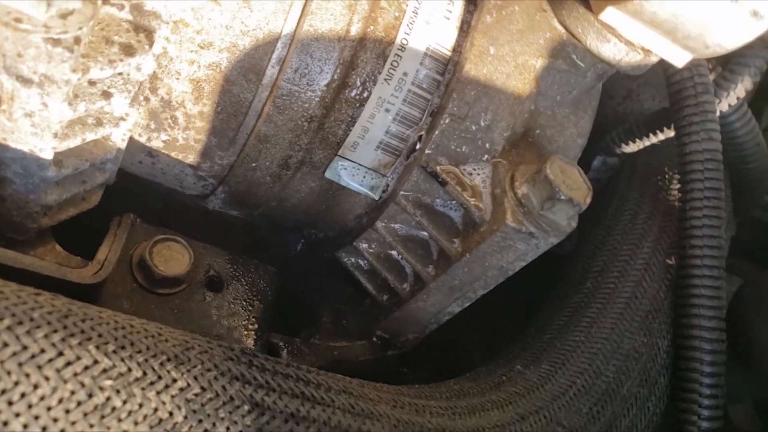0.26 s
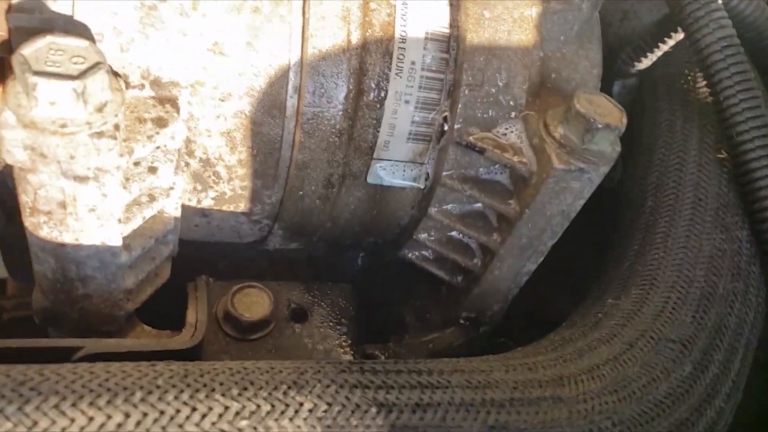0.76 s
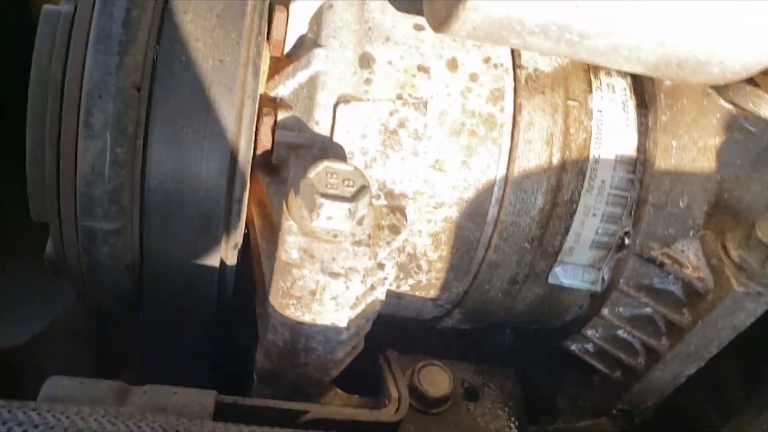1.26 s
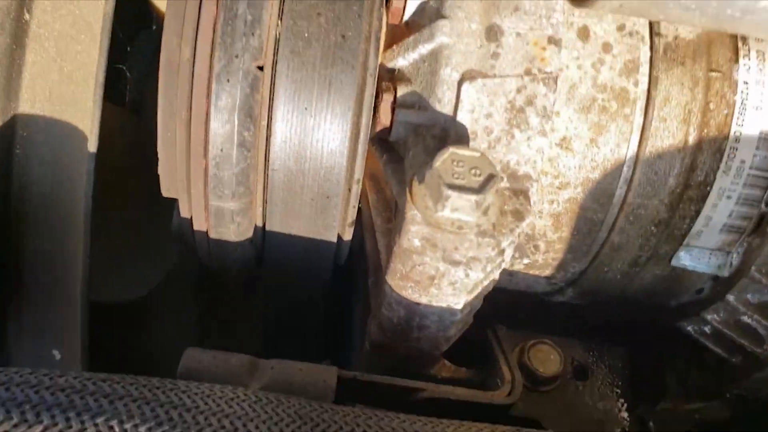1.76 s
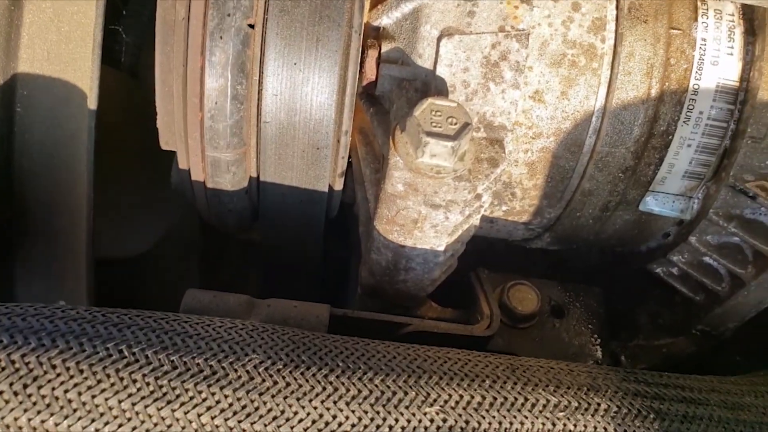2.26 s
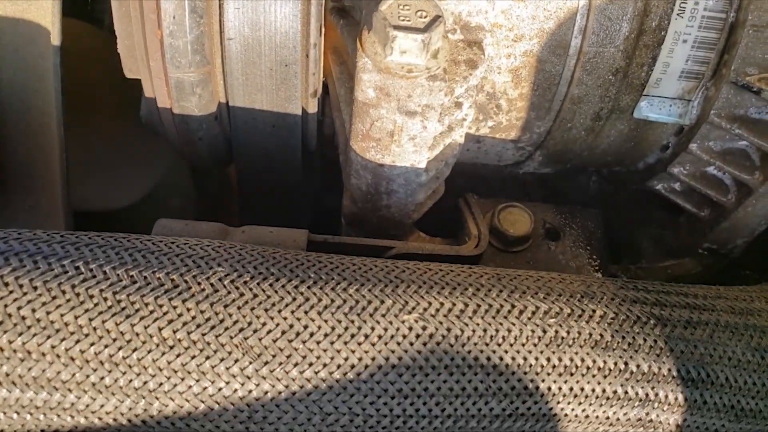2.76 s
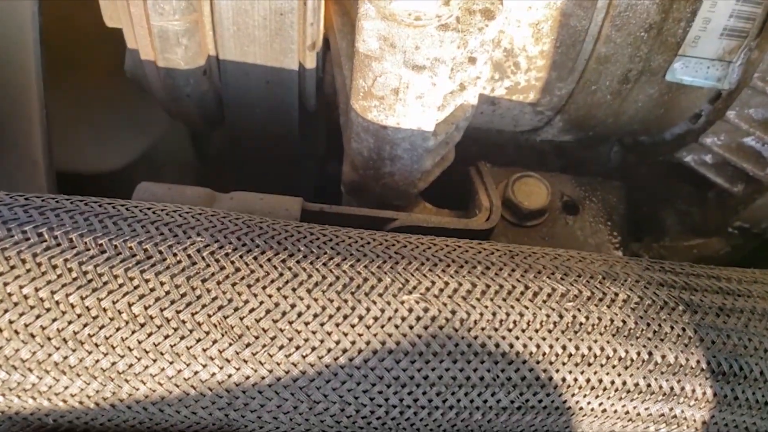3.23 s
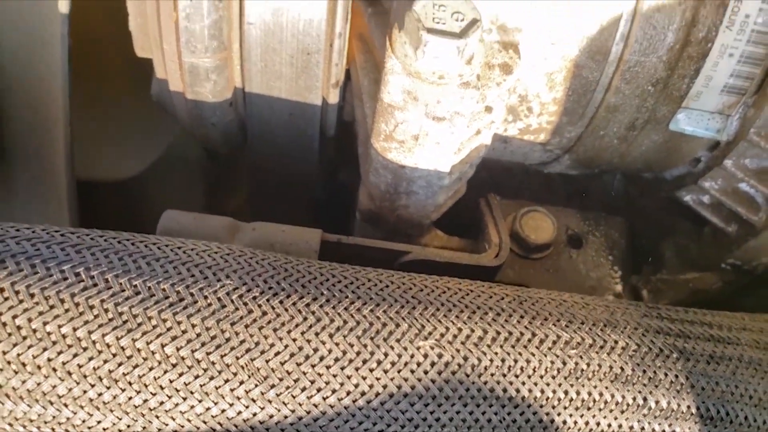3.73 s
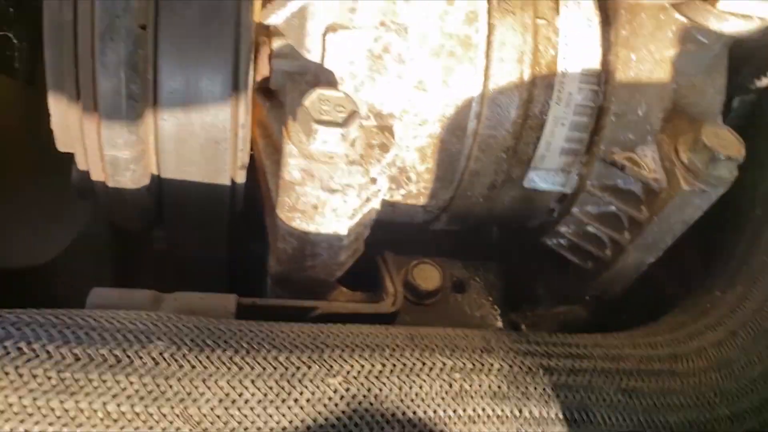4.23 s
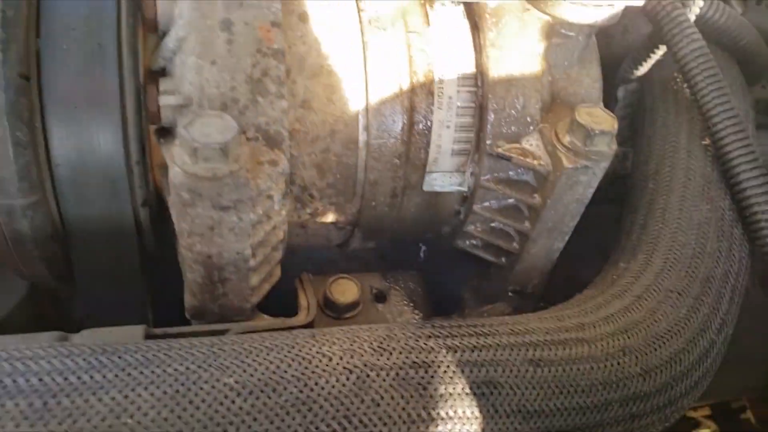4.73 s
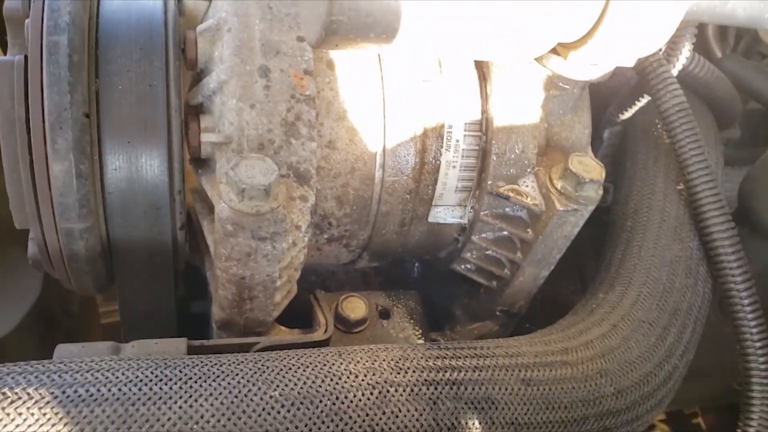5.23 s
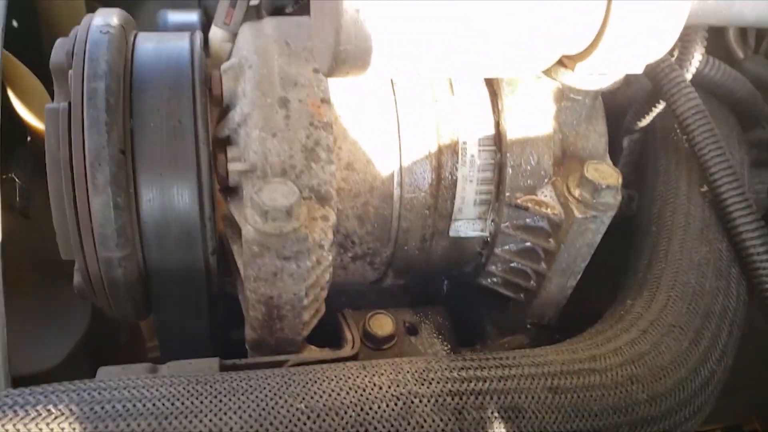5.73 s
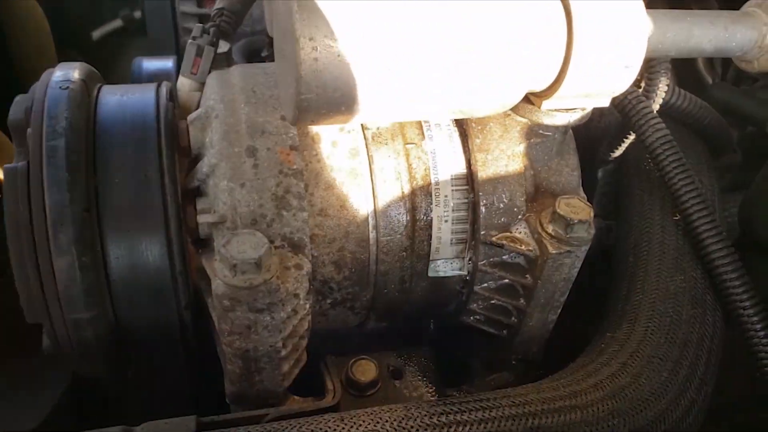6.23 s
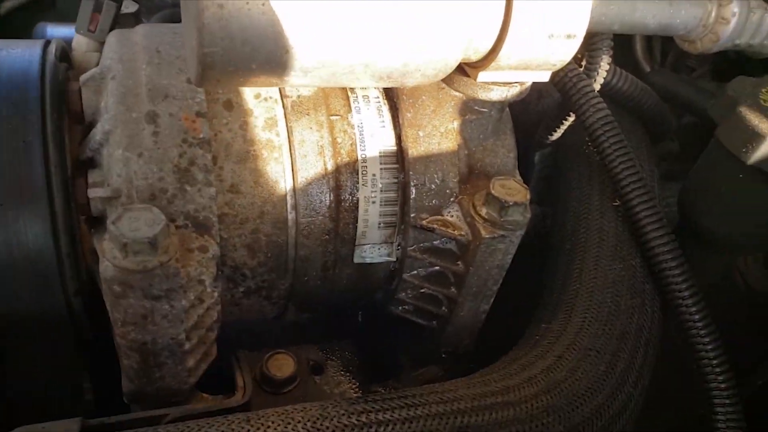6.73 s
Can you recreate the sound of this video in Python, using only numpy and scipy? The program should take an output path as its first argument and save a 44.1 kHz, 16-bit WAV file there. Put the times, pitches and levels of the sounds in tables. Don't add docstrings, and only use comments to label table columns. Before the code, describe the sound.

Outdoors, a steady low idle and far traffic rumble; two sharp hollow metal knocks mid-way, faint insect chirps, then close clicks from handling.

```python
import sys
import numpy as np
from scipy import signal
from scipy.fft import rfft, irfft, next_fast_len
from scipy.io import wavfile
from scipy.ndimage import uniform_filter1d

SR = 44100
rng = np.random.default_rng(int(sys.argv[2]) if len(sys.argv) > 2 else 0)


def volts(x):
    e = np.asarray(x, float) / 20
    return 10 ** e


def digitize_waveform(pressure):
    field = np.atleast_2d(pressure).T
    bounded = np.clip(field, -1, 1)
    quanta = np.round(bounded * 32767).astype(np.int16)
    wavfile.write(sys.argv[1], SR, quanta)


N = 308170
TIME = np.arange(N) / SR

# pitch_hz, t60_s (time to fade 60 dB), first_swing (sign and relative size),
# level_db when struck at spot 0, level_db when struck at spot 1
BODY_MODES = [(83.8, 0.19, 0.45, -14.5, -15), (98.8, 0.33, 0.38, -20, -22.5),
              (134.2, 0.25, -0.57, -27, -15), (205.4, 0.13, -0.37, -15, -13.5), (156, 0.12, 0.98, -21, -20),
              (255, 0.082, -1.1, -15.5, -28), (275, 0.11, -0.87, -18, -15), (357, 0.17, -1.7, -31, -33),
              (440, 0.3, 0.39, -31, -25), (508, 0.26, -0.29, -34, -28), (603, 0.067, -0.33, -18, -15.5),
              (688, 0.061, 0.63, -64, -29), (746, 0.079, -1.02, -20.5, -27.5),
              (786, 0.038, -0.54, -36, -28), (816, 0.09, -0.36, -37.5, -43), (985, 0.08, 0.084, -21, -12),
              (904, 0.11, -0.62, -27, -34), (1100, 0.084, 0.27, -41, -27), (1377, 0.11, -0.58, -38, -21.5),
              (1520, 0.046, 0.63, -27.5, -23), (1655, 0.01, -0.81, -17, -41), (2250, 0.026, 0.88, -27, -37),
              (2690, 0.015, -0.95, -21.5, -30), (4240, 0.014, 0.41, -25, -19),
              (5980, 0.007, -0.84, -26, -26), (6780, 0.014, 0.9, -32, -23.5)]
# start_s, spot (0 or 1), strength_db, contact_brightness_hz, rattle_db
BLOWS = [(2.7898, 0, 0.5, 9000, -22), (2.7984, 0, -4.5, 1100, -62), (2.811, 0, -17, 2500, -45),
         (2.8194, 0, -16, 900, -35.5), (2.858, 0, -28, 700, -38), (3.183, 1, -18.5, 476, -59),
         (3.4778, 1, -14, 1500, -39), (3.5095, 1, -0.5, 8900, -23), (3.5197, 1, -1, 700, -41),
         (3.535, 1, -10.5, 1200, -48), (3.551, 1, -23, 800, -67), (3.576, 1, -16, 400, -56),
         (1.194, 0, -27.5, 1200, -52), (1.268, 0, -30.5, 1470, -60)]
# pitch_hz, level_db (per Hz)
RATTLE_COLOUR = [(150, 3.5), (300, -1), (500, -7.5), (800, -13), (1400, -19), (2500, -26), (6000, -26),
                 (16000, -66)]
# pitch_hz, t60_s
RATTLE_FADE = [(80, 0.3), (400, 0.22), (1500, 0.14), (6000, 0.026), (16000, 0.071)]
# pitch_hz, left_minus_right_db
KNOCK_LEAN = [(60, 4), (125, -1), (250, -1.5), (500, -2), (1000, -1), (2000, -7), (5000, -9.5)]
KNOCK_PAN_DB, KNOCK_LAG_S, PORT_SPREAD_DB = -2.5, 0.00034, 1.5

# start_s, peak_db, ring_hz, left_minus_right_db, ring_share (0-1)
CRACKS = [
    (2.7895, -26, 2900, -8, 0),
    (3.5093, -20.5, 2870, -7, 0.05),
]
# start_s, peak_db, ring_hz, left_minus_right_db, ring_share (0-1)
TICKS = [(0.258, -45, 12900, 0.0, 0.46), (0.6517, -45.5, 6750, -4, 0.76), (1.324, -40, 9920, 10, 0.44),
         (4.909, -41, 7570, 9, 0.08), (5.184, -36, 12700, 3.5, 0), (5.736, -37.5, 7600, -12, 0.28),
         (5.745, -31, 7500, -8, 0.13), (5.804, -33, 6860, -9, 0.08), (6.072, -24.5, 6530, 7, 0.17),
         (6.405, -31.5, 7400, 2, 0.14), (6.7004, -34, 11800, 0, 0)]
# start_s, peak_db, ring_hz, left_minus_right_db, ring_share (0-1)
TAPS = [
    (0.015, -43, 3300, -19, 0.27),
    (0.0554, -42.5, 3660, -24, 0.5),
    (0.064, -26.5, 3600, -29, 0.24),
    (0.939, -40, 3700, -6, 0.86),
    (5.4829, -25, 2600, 2, 0.07),
    (5.4977, -38, 2920, -23, 0.04),
    (5.746, -55, 2620, -19, 0.9),
    (5.5259, -38, 2480, -22, 0.28),
]
# start_s, peak_db, ring_hz, left_minus_right_db, ring_share (0-1)
THUDS = [(.034, -54, 3260, -18, 0.5), (.931, -54, 2260, -11, 0.05), (1.029, -56, 1240, -12, 0.15),
         (1.177, -50, 1220, -7, 0.47), (1.194, -48, 980, 9, 0.67), (1.196, -51, 1380, -8, 0.8),
         (1.198, -50.5, 2370, -6, 0.56), (1.268, -54.5, 980, -4, 0.8), (1.298, -58, 1100, 2, 0.36),
         (1.309, -57, 1290, -1, 0.44), (1.268, -60, 1800, -2, 0.4), (1.181, -54, 2270, -6, 0.5),
         (3.019, -63, 1030, -21, 0.3), (3.2159, -43, 2890, -13.5, 0), (5.483, -51, 650, -29, 0.1),
         (5.526, -51.5, 610, -18, 0.19), (6.132, -58, 860, -16, 0)]
# t60_s, lowest_share (lowest frequency as a share of the ring)
CONTACTS = [
    (0.0058, 0.79),
    (0.0039, 0.6),
    (0.034, 0.08),
    (0.015, 0.92),
]

# start_s, length_s, level_db, pitch_hz, width_hz, left_minus_right_db
SQUEAKS = [
    (1.09, 0.097, -65.5, 2730, 150, -5),
    (1.146, .02, -65, 1150, 252, -2),
    (0.065, 0.069, -70, 4840, 250, -8),
    (0.069, 0.026, -61, 3250, 400, -13),
    (2.843, .035, -53.5, 2880, 500, -6),
    (5.528, .05, -66, 2300, 900, -11),
]
# start_s, length_s, level_db, left_minus_right_db, lowest_hz
RUBS = [(.02, 0.087, -63, -14, 10000), (.19, .08, -69, -8, 10100), (.35, 0.15, -59, -3, 8000),
        (0.9, 0.28, -61, -1, 1180), (1.125, 0.08, -55.5, 2, 4040), (1.96, 0.26, -65, -1, 1450),
        (2.547, 0.22, -64.5, -3, 840), (2.793, 0.028, -56, -10, 1505), (2.825, 0.065, -47.5, -2.5, 1520),
        (2.983, 0.049, -55, -2, 3540), (3.196, 0.19, -65, -5, 1490), (3.478, .012, -56, -2, 5000),
        (3.51, 0.056, -49.5, -1, 1510), (4.646, 0.015, -61.5, 16, 4000), (4.709, 0.034, -58.5, 9, 3940),
        (4.908, 0.029, -57, 13, 4000), (4.946, 0.045, -55, 14, 3700), (5.13, 0.038, -61.5, 13, 4440),
        (5.183, 0.047, -58, 8, 10500), (5.408, 0.041, -57, 12, 10500), (5.274, 0.08, -55.5, 17, 3720),
        (5.536, 0.026, -53.5, -10, 6000), (5.777, 0.15, -56, -1, 8200), (6.496, 0.25, -60.5, 4, 9900),
        (6.035, 0.39, -59, -2, 1510)]
# start_s, length_s, level_db, left_minus_right_db, highest_hz
MUFFLED_RUBS = [
    (0.013, 0.085, -55, -12, 7450),
    (1.088, 0.12, -56, -1, 3000),
    (1.13, 0.077, -59, -2, 2700),
    (1.272, 0.042, -54, -1, 1500),
    (5.423, 0.086, -62, -15, 2520),
    (6.048, 0.39, -63.5, -7.5, 1240),
]
MUFFLED_SPAN = 3.24
# pitch_hz, level_db
PORT_COLOUR = [(800, 12), (2500, 6), (3400, 3), (4300, 3.5), (7200, 7), (9000, -8), (11000, 2), (13500, 4),
               (15500, 4.5), (17000, -22)]

# start_s, length_s, level_db, pitch_hz, left_minus_right_db
PUFFS = [
    (.42, .07, -41, 60, 1.5),
    (1.12, .09, -45, 70, 1.5),
    (1.855, .07, -47, 88, 14),
    (1.97, .1, -42, 72, 16),
    (2.1, .15, -48, 65, 10),
    (2.295, .08, -45, 65, 14),
    (4.93, .12, -45, 65, 12),
    (5.12, .1, -47, 65, 10),
    (6.35, .1, -46, 60, 3),
    (6.75, .24, -45, 65, 0.5),
]

# start_s, gap_s, chirp_count, level_db
PHRASES = [
    (1.331, .092, 7, -73),
    (1.933, .078, 3, -71),
    (2.174, .0885, 5, -71.5),
    (2.627, .0945, 6, -70.5),
    (3.166, .0755, 5, -71),
    (3.535, .069, 6, -72),
    (3.942, .064, 6, -75),
    (5.749, .08, 1, -73),
    (6.105, .086, 5, -76),
    (6.542, .094, 5, -76),
]
# multiple, level_db
CHIRP_PARTIALS = [(2, -6), (3, 2), (4, 6), (5, 7)]
CHIRP_TOP_HZ, CHIRP_MID_HZ, CHIRP_END_HZ = 4150, 3500, 2760
CHIRP_WAVER_HZ = 60
STROKE_SHARE = .38

# multiple, level_db (rms)
IDLE_ORDERS = [(2, -51), (3, -57), (4.33, -57), (5, -62), (6, -59), (7, -63)]
IDLE_HZ, IDLE_WAVER_HZ, IDLE_FLUTTER_DB = 27.85, .06, 1.4

# pitch_hz, level_db (per Hz)
RUMBLE = [(32, -39), (40, -4.5), (50, -4), (65, -3), (90, -2), (125, -8.5), (170, -13.5), (250, -21)]
# pitch_hz, level_db (per Hz)
ROAR = [(200, -11), (250, 3.5), (290, 0), (350, -6.5), (420, -13), (520, -24.5), (700, -21.5)]
# pitch_hz, level_db (per Hz)
STREET = [(260, -19), (450, -1), (720, -19), (918, -8), (1320, -11), (1890, -4), (2500, -10.5),
          (3110, -15.5), (3600, -10.5), (4680, -26), (7920, -120)]
# pitch_hz, level_db (per Hz)
AIR = [(2600, 21), (3400, -27.5), (4200, 5), (5500, 5.5), (7300, 7.5), (8200, 5), (9300, -30),
       (10800, -11.5), (12000, 10.5), (15500, 5.5), (17000, 4.5)]
# pitch_hz, likeness (-1 to 1)
LIKENESS = [(60, 0.98), (180, 0.94), (550, 0.55), (1650, -0.28), (4970, 0.029), (15000, -0.1)]
# pitch_hz, left_minus_right_db
BACKGROUND_LEAN = [(60, -0.5), (180, -1), (550, -0.5), (1650, -8), (4970, 1.0), (15000, 5)]
# start_s, swell_db
TRAFFIC = [(0.0, -3.5), (0.9, -4), (1.2, -3.5), (1.75, -3), (2.05, 6), (2.4, 3), (2.75, 2), (3.0, 6.5),
           (3.3, 3.5), (3.62, 1), (4.3, -4), (4.75, -7), (5.14, 0.5), (5.4, 3.5), (5.72, -6.5), (6.23, 3),
           (6.62, -1.5), (6.99, 3)]
# start_s, stir_db
STIR = [(0.0, 2.5), (0.25, 0.5), (0.9, 0), (1.17, 7.5), (1.4, 3), (2.37, 1.5), (2.65, 5.5), (3.0, -0.5),
        (3.62, -1), (3.97, -4), (5.14, -0.5), (5.42, 4.5), (6.03, -1), (6.25, -2), (6.99, -0.5)]
RUMBLE_DB, ROAR_DB, STREET_DB, AIR_DB = -48.5, -60.5, -66, -63
RUMBLE_FOLLOWS, AIR_FOLLOWS = 0.2, 0.17

CUTOFF_HZ, LIMIT = 16050, .66


def rms_one(x):
    return x / np.sqrt(np.mean(x ** 2) + 1e-20)


def at_hz(points, hz):
    table_hz, values = np.transpose(points)
    return np.interp(np.log(hz), np.log(table_hz), values)


def pan(db):
    return volts(np.array([[db / 2], [-db / 2]]))


def add(out, s, sound):
    i = max(round(s * SR), 0)
    out[:, i:i + sound.shape[1]] += sound[:, :N - i]


def band_pass(low_hz, high_hz, x):
    return signal.sosfilt(signal.butter(2, [low_hz, high_hz], "band", fs=SR, output="sos"), x)


def low_pass(order, top_hz, x):
    return signal.sosfilt(signal.butter(order, top_hz, fs=SR, output="sos"), x)


def high_pass(order, low_hz, x):
    return signal.sosfilt(signal.butter(order, low_hz, "high", fs=SR, output="sos"), x)


def drift(rate):
    r = np.exp(-80 * np.pi * rate / SR)
    white = rng.standard_normal(N // 40 + 2002)
    slow = signal.lfilter([1], [1, -2 * r, r * r], white)[2000:]
    return np.interp(np.arange(N) / 40, np.arange(len(slow)), rms_one(slow))


def bands(spectrum, size):
    octaves = np.log2(spectrum[-1][0] / spectrum[0][0])
    edges = spectrum[0][0] * 2 ** np.arange(0, octaves + .3, 1 / 3)
    white = rng.standard_normal((2, 2, size + 4000))
    for k, (low, high) in enumerate(zip(edges, edges[1:])):
        mid, side = band_pass(low, min(high, .45 * SR), white[k % 2])[:, 4000:]
        hz = np.sqrt(low * high)
        alike = np.clip(at_hz(LIKENESS, hz), -1, 1)
        stereo = np.sqrt(1 + alike) * mid + np.sqrt(1 - alike) * side * [[1], [-1]]
        yield hz, volts(at_hz(spectrum, hz)) * stereo


def port_colour(x):
    size = next_fast_len(N + SR // 10)
    hz = np.maximum(np.fft.rfftfreq(size, 1 / SR), 1)
    return irfft(rfft(x, size) * volts(at_hz(PORT_COLOUR, hz)), size)[:, :N]


def body_ring(spot, contact_hz, t):
    arrival = np.maximum(t - np.array([[KNOCK_LAG_S], [0]]), 0)
    ring = np.zeros((2, len(t)))
    for hz, t60, swing, *spot_db in BODY_MODES:
        own_db = PORT_SPREAD_DB * rng.normal(0, 1, (2, 1))
        fade = volts(spot_db[spot] + own_db - 60 * arrival / t60)
        ring += swing * fade * pan(at_hz(KNOCK_LEAN, hz)) * np.sin(2 * np.pi * hz * arrival)
    return low_pass(2, min(contact_hz, 20000), ring)


def loose_rattle(t):
    rattle = sum(band * volts(-60 * t / at_hz(RATTLE_FADE, hz)) for hz, band in bands(RATTLE_COLOUR, len(t)))
    return rattle * np.minimum(t / 0.00069, 1)


def knocks():
    out, t = np.zeros((2, N)), TIME[:SR // 2]
    for s, spot, db, contact_hz, rattle_db in BLOWS:
        ring = body_ring(spot, contact_hz, t)
        add(out, s, pan(KNOCK_PAN_DB) * (volts(db) * ring + volts(rattle_db + 20) * loose_rattle(t)))
    return out


def casing_touches():
    out, t = np.zeros((2, N)), TIME[:SR // 10]
    for touches, (t60, low_share) in zip((TICKS, TAPS, THUDS, CRACKS), CONTACTS):
        for s, db, hz, pan_db, ring_share in touches:
            low_hz = hz * min(low_share, .9)
            top_hz = min(max(hz ** 2 / 400, 2 * low_hz), 19000)
            white = rng.standard_normal((3, len(t)))
            noise = white[0] + 0.72 * white[1:]
            fade = 0.22 * volts(-90 * t / t60) + 0.049 * volts(-25 * t / t60)
            snap = rms_one(band_pass(low_hz, top_hz, noise)) * fade
            ring = -np.sin(2 * np.pi * hz * t) * volts(-55 * t / t60)
            add(out, s, volts(db) * pan(pan_db) * ((1 - ring_share) * snap + ring_share * ring))
    return port_colour(out)


def squeaks():
    out = np.zeros((2, N))
    for s, length, db, hz, width_hz, pan_db in SQUEAKS:
        swell = signal.windows.tukey(max(round(length * SR), 9), .5)
        grain = rms_one(band_pass(hz - width_hz / 2, hz + width_hz / 2, rng.standard_normal(SR // 2)))
        add(out, s, volts(db) * pan(pan_db) * grain[-len(swell):] * swell)
    return out


def rubs():
    grain_db = 1.5 * np.minimum(rng.exponential(1, (2, N)), 5)
    grains = volts(grain_db) * rng.standard_normal((2, N))
    fibre = rms_one(port_colour(grains)) * volts(1.3 * drift(37.5))
    open_rubs = [(*row, None) for row in RUBS]
    muffled_rubs = [(*row, top_hz / MUFFLED_SPAN, top_hz) for *row, top_hz in MUFFLED_RUBS]
    out = np.zeros((2, N))
    for s, length, db, pan_db, low_hz, top_hz in open_rubs + muffled_rubs:
        i, u = round(s * SR), np.linspace(0, 1, max(round(length * 1.33 * SR), 9))
        stroke = np.minimum(u / .12, 1) * np.minimum((1 - u) / .35, 1)
        piece = high_pass(4, low_hz, fibre[:, i:i + len(u)] * stroke)
        if top_hz:
            piece = low_pass(4, top_hz, piece)
        add(out, s, volts(db) * pan(pan_db) * piece)
    return out


def wind():
    out = np.zeros((2, N))
    for s, length, db, hz, pan_db in PUFFS:
        swell = np.hanning(max(round(length * 1.3 * SR), 9))
        noise = band_pass(hz * .75, hz * 1.3, rng.standard_normal((3, SR)))
        shared, left, right = noise[:, -len(swell):] * swell
        lumps = np.array([rms_one(shared + 0.37 * own) for own in (left, right)])
        add(out, s, volts(db) * pan(pan_db) * lumps)
    return out


def chirp(gap):
    length = STROKE_SHARE * gap
    slope = (CHIRP_TOP_HZ - CHIRP_END_HZ) / length
    t = TIME[:round(length * SR)]
    waver = rms_one(uniform_filter1d(rng.standard_normal(len(t)), size=60))
    turns = CHIRP_TOP_HZ * t - slope * t ** 2 / 2 + np.cumsum(CHIRP_WAVER_HZ * waver) / SR
    uneven_db = 3 * np.interp(t, np.linspace(0, t[-1], 12), rng.normal(0, 1, 12))
    swell = signal.windows.tukey(len(t), .4) * volts(6 * t / t[-1] + uneven_db)
    tone = np.zeros(len(t))
    for k, level_db in CHIRP_PARTIALS:
        colour_db = 0.038 * at_hz(AIR, k * (CHIRP_TOP_HZ - slope * t))
        tone += volts(level_db + colour_db) * np.sin(2 * np.pi * k * turns)
    lead_s = (CHIRP_TOP_HZ - CHIRP_MID_HZ) / slope
    return lead_s, tone * swell


def insect():
    out = np.zeros((2, N))
    for start, gap, count, db in PHRASES:
        for k in range(count):
            lead_s, sound = chirp(gap)
            chirp_db = db + rng.standard_normal()
            add(out, start + k * gap - lead_s, volts(chirp_db + np.array([[0], [-14]])) * sound)
    return out


def idling():
    turns = np.cumsum(IDLE_HZ + IDLE_WAVER_HZ * drift(0.4)) / SR
    tones = np.zeros(N)
    for k, db in IDLE_ORDERS:
        level = volts(db + 2 + IDLE_FLUTTER_DB * drift(1.7))
        tones += level * np.sin(2 * np.pi * (k * turns + rng.random()))
    return pan(1.0) * tones


def far_noise(spectrum, patchy_db, rate):
    together = drift(rate / 4)
    out = np.zeros((2, N))
    for hz, band in bands(spectrum, N):
        flicker = volts(patchy_db * (0.46 * together + drift(rate)))
        out += flicker * pan(at_hz(BACKGROUND_LEAN, hz)) * band
    return rms_one(out)


def background():
    swell_db = np.interp(TIME, *np.transpose(TRAFFIC))
    stir_db = np.interp(TIME, *np.transpose(STIR))
    rumble = volts(RUMBLE_DB + RUMBLE_FOLLOWS * swell_db) * far_noise(RUMBLE, patchy_db=2.5, rate=2.4)
    roar = volts(ROAR_DB + swell_db) * far_noise(ROAR, patchy_db=2.8, rate=6.5)
    street = volts(STREET_DB + stir_db) * far_noise(STREET, patchy_db=1.8, rate=3.1)
    air = volts(AIR_DB + AIR_FOLLOWS * stir_db) * far_noise(AIR, patchy_db=1.6, rate=9.4)
    return rumble + roar + street + air


def scene():
    steady = rubs() + wind() + insect() + background()
    top_edge = signal.cheby2(14, 45, CUTOFF_HZ, fs=SR, output="sos")
    return knocks() + casing_touches() + squeaks() + idling() + signal.sosfilt(top_edge, steady)


def roll_off(x):
    return signal.sosfilt(signal.butter(12, 16990, fs=SR, output="sos"), x)


def record(dry):
    x = high_pass(4, 36, dry)
    x = x / (1 + (x / LIMIT) ** 6) ** (1 / 6)
    top_limit = signal.cheby2(14, 60, CUTOFF_HZ + 1000, fs=SR, output="sos")
    mix = signal.sosfilt(top_limit, x)
    return roll_off(mix)


dry = scene()
out = record(dry)
digitize_waveform(out)
```